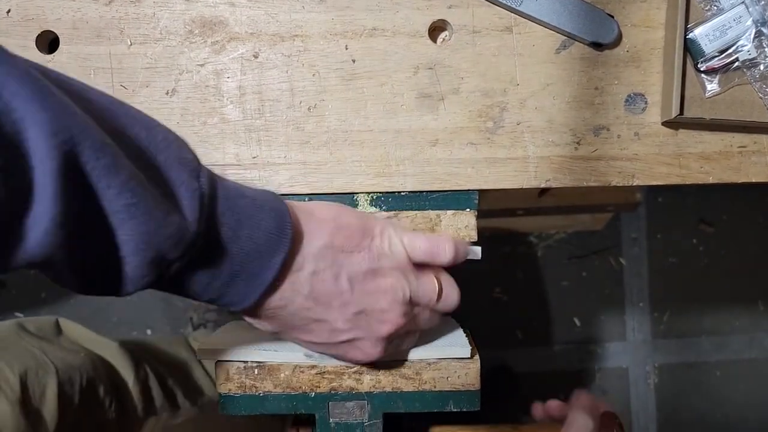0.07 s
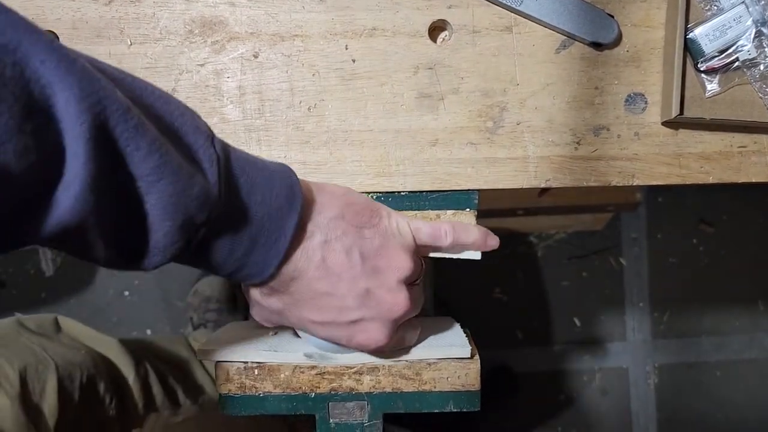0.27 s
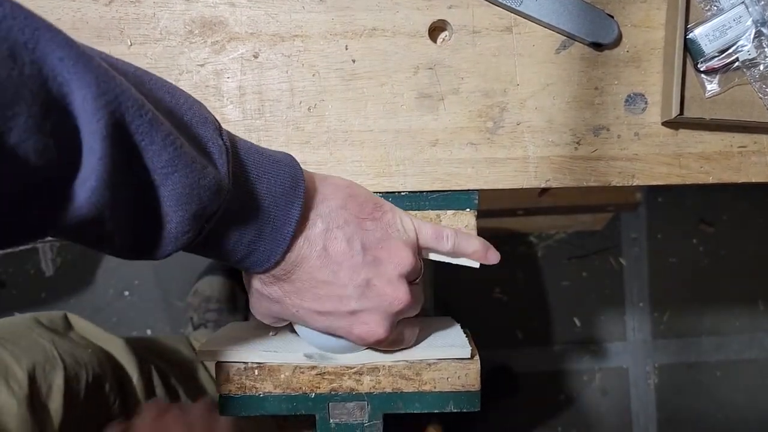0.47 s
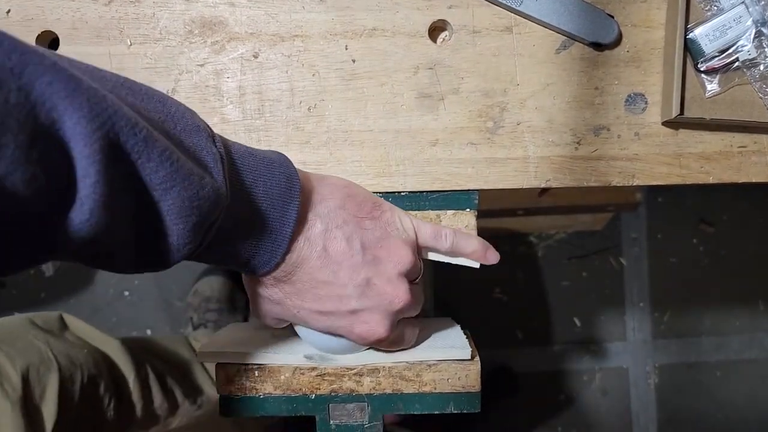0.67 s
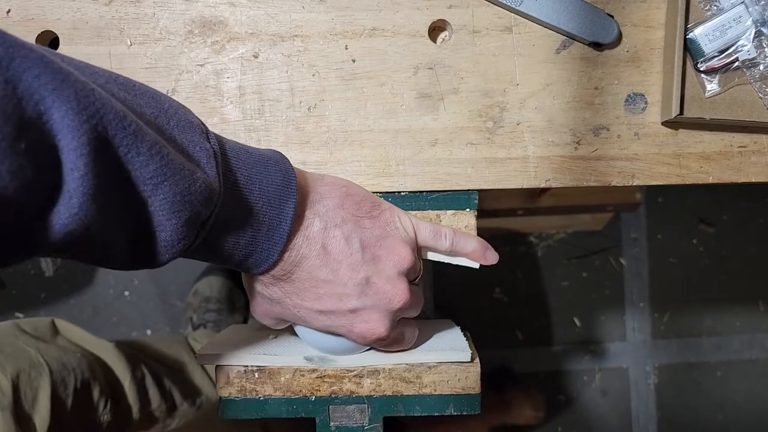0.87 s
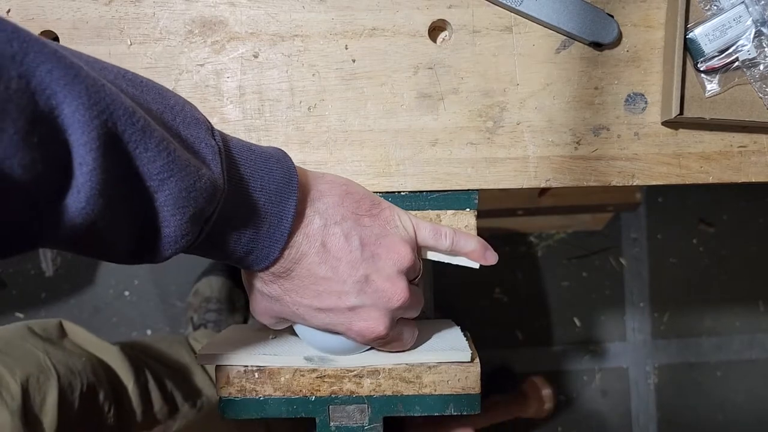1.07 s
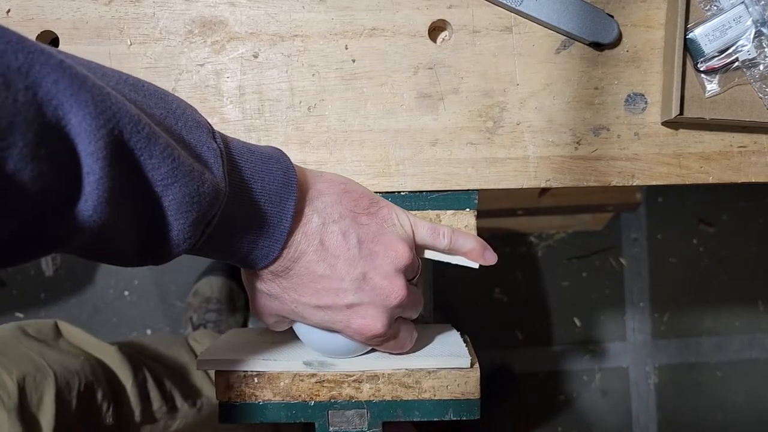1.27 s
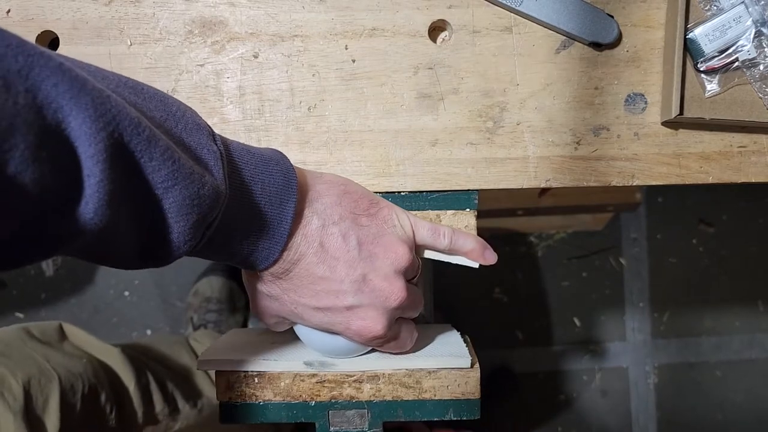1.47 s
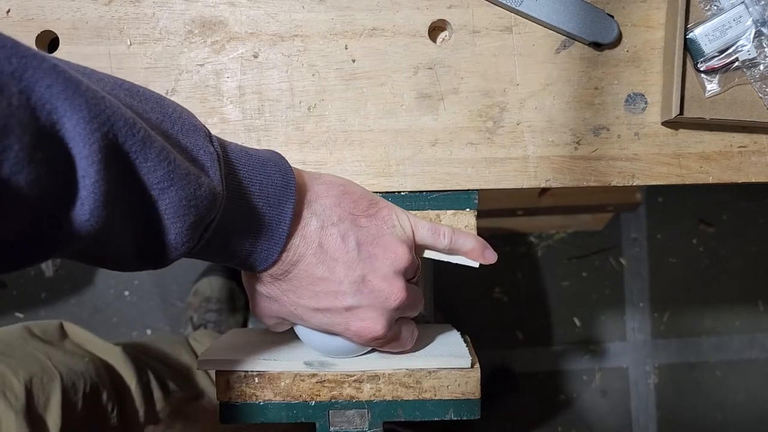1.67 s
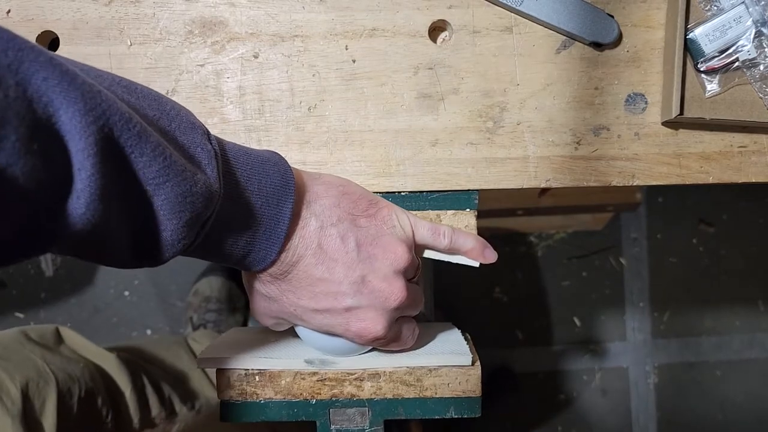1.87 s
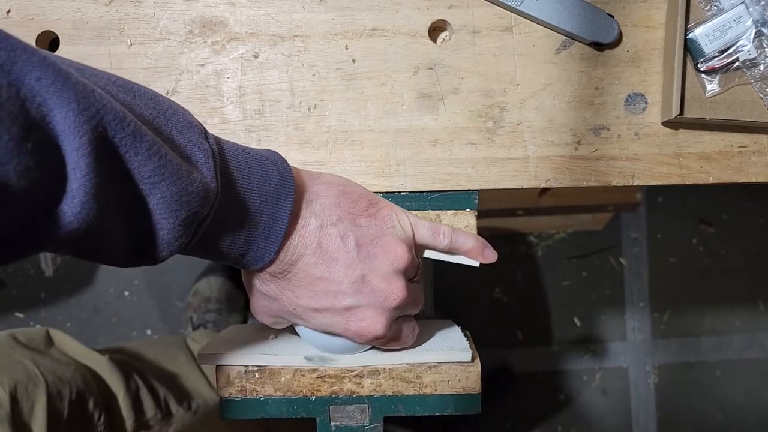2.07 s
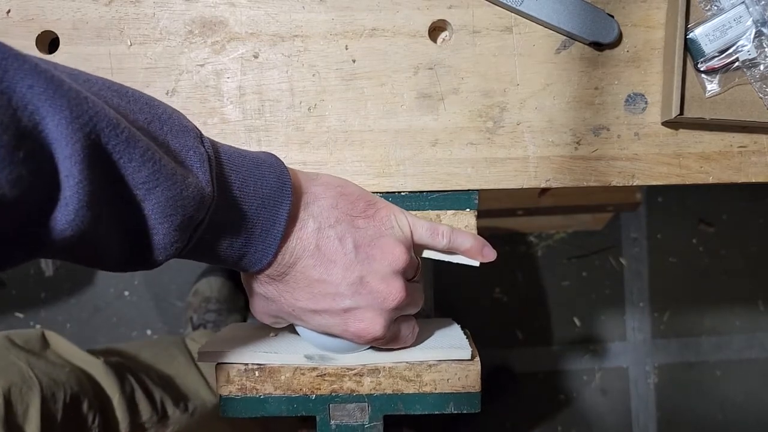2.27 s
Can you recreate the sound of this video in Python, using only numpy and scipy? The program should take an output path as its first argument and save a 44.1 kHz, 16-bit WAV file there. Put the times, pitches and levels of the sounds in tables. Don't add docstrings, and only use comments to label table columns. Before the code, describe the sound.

Close stereo pickup of a wooden-jawed vise knocking and chattering on a hard ball, bench thumping and screw grinding, a brief squeak midway, a second burst of clunks, then quiet hum and soft sleeve rubbing in a small workshop.

```python
import sys
import numpy as np
from scipy import signal
from scipy.fft import rfft, irfft
from scipy.io import wavfile
from scipy.ndimage import uniform_filter1d

SR = 44100
rng = np.random.default_rng(int(sys.argv[2]) if len(sys.argv) > 2 else 0)


def unload_wav(signal):
    wavfile.write(
        sys.argv[1],
        SR,
        np.round(np.clip(np.atleast_2d(signal).T, -1, 1) * 32767).astype(np.int16),
    )


def gain_from_decibels(decibels):
    exponent = np.asarray(decibels, float) / 20
    return 10 ** exponent


N = 101429

# mode_hz [Hz], level_db [dB]
BENCH_MODES = [(75, -7.5), (99, -1.5), (141, 1), (182, 9), (270, -4), (340, -4), (395, -0.5), (480, -0.5),
               (515, -3.5)]
# mode_hz [Hz], level_db [dB]
JAW_MODES = [(665, 3.5), (900, -3), (1100, -4), (1310, -3), (1450, -13), (1640, -1.5), (1815, -30),
             (2020, -4.5), (2200, -5), (2500, -21.5), (2900, -6.5), (3700, 2.5)]
BENCH_T60, JAWS_T60 = 0.14, 0.026
SOFT_HZ = 3390
WIDE_FROM_HZ = 424


def evened(x):
    return x / np.sqrt(np.mean(x ** 2) + 1e-20)


def slow_drift(count, span):
    noise = rng.standard_normal((count, N))
    return evened(uniform_filter1d(uniform_filter1d(noise, span), span))


def read(points, hz):
    f, value = np.transpose(points)
    return np.interp(np.log(hz + 1), np.log(f + 1), value)


def follow(curve):
    s, db = np.transpose(curve)
    return gain_from_decibels(np.interp(np.arange(N) / SR, s, db, left=-90, right=-90))


def add(mix, s, sound):
    part = mix[..., round(s * SR):][..., :sound.shape[-1]]
    part += sound[..., :part.shape[-1]]


def steep(x, hz, kind, order=4):
    return signal.sosfilt(signal.butter(order, hz, kind, fs=SR, output="sos"), x)


def clicks(size, per_s, spread_db):
    strength = gain_from_decibels(spread_db * np.minimum(rng.exponential(1, size), 4))
    present = rng.random(size) < per_s / SR
    return rng.standard_normal(size) * strength * present


def body(modes, t60, detune=0):
    wide_rad, scatter_db, damping_slope = 2.89, 3, 0.16
    hz, db = np.transpose(modes)[:, :, None]
    t = np.arange(SR // 4) / SR
    draw = rng.uniform(-1.083, 1, (len(modes), 3))
    lag = wide_rad * draw[:, :1] / (1 + (WIDE_FROM_HZ / hz) ** 4)
    turn = 2 * np.pi * hz * (1 + detune * draw[:, 1:2]) * t
    decay_db = -60 * t / t60 * (hz / hz[0]) ** damping_slope
    size = gain_from_decibels(db + scatter_db * draw[:, 2:] + decay_db)
    both = np.array([(size * np.sin(turn + side * lag / 2)).sum(0) for side in (1, -1)])
    return both / np.linalg.norm(both) * np.sqrt(2)


def ring(x, response):
    return signal.fftconvolve(x[None], response, axes=1)


def workshop(x):
    # band_hz [Hz], t60_s [s]
    room_decay = [(150, 0.65), (600, 0.48), (2000, 0.35), (6000, 0.53), (14000, 0.38)]
    taps = np.zeros((2, SR))
    at = np.arange(200, SR - 20, 20) + rng.integers(0, 20, (2, (SR - 201) // 20))
    np.put_along_axis(taps, at, rng.choice([-1., 1.], at.shape), 1)
    hz, t, z = signal.stft(taps, SR, nperseg=256)
    wide = 1 / (1 + (WIDE_FROM_HZ / (hz[:, None] + 1)) ** 4)
    z = np.array([z[0], wide * z[1] + np.sqrt(1 - wide ** 2) * z[0]])
    dying = gain_from_decibels(-60 * t / read(room_decay, hz)[:, None])
    tail = signal.istft(z * dying, SR, nperseg=256)[1]
    return signal.fftconvolve(x[None], tail / np.linalg.norm(tail[0]), axes=1)[:, :N]


def hum():
    # pitch_hz [Hz], level_db [dB rms]
    motor_tones = [(47, -49), (118.4, -62.5)]
    out = np.zeros(N)
    for (hz, db), sway in zip(motor_tones, slow_drift(len(motor_tones), 3000)):
        turn = 2 * np.pi * np.cumsum(hz + 0.2 * sway) / SR
        out += np.sqrt(2) * gain_from_decibels(db + 0.8 * sway) * np.sin(turn)
    return out


def coloured(pair, spectrum, db):
    # band_hz [Hz], likeness [0 to 1]
    side_likeness = [(100, 0.97), (300, 0.8), (700, 0.32), (3000, 0.18)]
    hz = np.fft.rfftfreq(N, 1 / SR)
    a, b = rfft(pair)
    same = np.clip(read(side_likeness, hz), 0, 1)
    z = np.array([a, same * a + np.sqrt(1 - same ** 2) * b]) * gain_from_decibels(read(spectrum, hz))
    return gain_from_decibels(db) * irfft(z, N) / np.std(irfft(z * (hz > 200), N))


def hiss():
    # band_hz [Hz], level_db [dB]
    air_colour = [(38, -11.5), (65, -11.5), (97, -10.5), (414, -29), (755, -42), (1630, -34), (3500, -48),
                  (4550, -86.5), (7700, -120)]
    # band_hz [Hz], level_db [dB]
    cloth_colour = [(1470, -32.5), (2500, -9.5), (4560, -4), (7570, -3.5), (15700, -15.5)]
    # time_s [s], level_db [dB]
    rub_level = [(0, -64), (.6, -67), (.72, -72), (.83, -66), (.87, -71), (1.05, -67), (1.15, -68),
                 (1.3, -60.5), (1.36, -98), (1.49, -81.5), (1.7, -53.5), (1.81, -108), (1.86, -60.5),
                 (2.02, -66), (2.08, -74), (2.22, -72.5), (2.24, -60.5), (2.26, -75), (2.3, -76)]
    grain = np.array([clicks(N, 55000, spread_db=-20) for _ in "lr"])
    rub = coloured(grain, cloth_colour, db=2.5) * follow(rub_level)
    return rub + coloured(rng.standard_normal((2, N)), air_colour, db=-65)


def whistle(size, hz, overtones):
    turn = 2 * np.pi * np.cumsum(hz) / SR
    return size * np.sin(turn) + sum(gain_from_decibels(d) * size ** 0.97 * np.sin(k * turn) for k, d in overtones)


def squeaks():
    # time_s [s], pitch_hz [Hz], level_db [dB rms]
    squeal_path = [(0.72, 3340, -62.5), (0.742, 3203, -24.5), (0.75, 3235, -19), (.765, 3180, -19),
                   (.778, 3173, -40.5), (0.784, 3162, -34), (0.796, 3277, -44.5), (.81, 3224, -41),
                   (0.823, 3227, -36.5), (0.831, 3156, -23.5), (0.834, 3110, -35), (.842, 3080, -45.5),
                   (.85, 3200, -46), (.875, 3213, -43), (.905, 3210, -49), (0.919, 3200, -53.5),
                   (0.941, 3200, -56.5), (0.987, 3200, -54)]
    # multiple [x pitch], level_db [dB at full strength]
    squeal_overtones = [(2, -27), (3, -44.5), (4, -56)]
    # peak_s [s], level_db [dB rms], rise_s [s], fall_s [s], pitch_hz [Hz]
    short_whistles = [
        (0.307, -40, 0.0022, 0.0027, 3270),
        (.648, -48.5, 0.0048, 0.007, 3197),
        (.672, -63, 0.0026, 0.0099, 12250),
        (1.652, -72.5, .005, 0.0086, 14300),
    ]
    wobble_hz, sag_hz, flutter_db = 22, 12, 2.5
    t = np.arange(N) / SR
    wobble, flutter = slow_drift(2, 150)
    s, hz, db = np.transpose(squeal_path)
    size = np.sqrt(2) * follow(np.transpose([s, db]))
    weak = 1 / (1 + size / 0.01)
    pitch = np.interp(t, s, hz) + wobble_hz * wobble * weak
    out = whistle(size * gain_from_decibels(flutter_db * flutter * weak), pitch, squeal_overtones)
    for s, db, rise, fall, hz in short_whistles:
        swell = np.clip((t - s) / np.where(t < s, rise, fall), -50, 50)
        size = np.sqrt(2) * gain_from_decibels(db) / np.cosh(swell)
        pitch = hz * (1 + wobble_hz / 3200 * wobble) - sag_hz * np.tanh((t - s) / (2 * fall))
        out += whistle(size, pitch, [])
    return out * gain_from_decibels([[.7], [-.7]])


def grind():
    # time_s [s], level_db [dB]
    screw_load = [(.1, -72), (.2, -50.5), (.25, -29.5), (.36, -43.5), (.44, -45.5), (.5, -25), (.62, -43),
                  (.72, -45.5), (.87, -38.5), (1.08, -39.5), (1.16, -47.5), (1.26, -37.5), (1.36, -46),
                  (1.49, -66.5), (1.57, -33), (1.74, -41), (1.9, -42.5), (2.08, -58)]
    drive = evened(clicks(N, 3500, spread_db=4.0)) * follow(screw_load)
    bench = gain_from_decibels(5.5) * ring(drive, body(BENCH_MODES, BENCH_T60))
    jaws = gain_from_decibels(-6.5) * ring(drive, body(JAW_MODES, JAWS_T60))
    return steep((bench + jaws)[:, :N], SOFT_HZ, "low")


def thump(s, db, upper_db, hz):
    length = round(0.011 * SR)
    push = np.hanning(length) * rng.standard_normal(2000)[:length]
    bench = steep(ring(push, body(BENCH_MODES, BENCH_T60, 0.042)), 485, "low")
    hollow = steep(ring(push, body([(hz, 0), (2 * hz, -6)], t60=0.048)), 1200, "low")
    bench = gain_from_decibels(2) * bench / abs(bench).max()
    hollow = gain_from_decibels(upper_db + 8) * hollow / abs(hollow).max()
    return s - .003, gain_from_decibels(db) * (bench + hollow)


def jolt(s, db):
    # mode_hz [Hz], level_db [dB]
    handle_modes = [(7340, 0.5), (8370, -15.5)]
    rattle = np.exp(-np.arange(2000) / 500) * clicks(2000, 4100, spread_db=2.0)
    out = ring(rattle, body(handle_modes, 0.02, 0.006)[:, :2000])
    return s, gain_from_decibels(db) * out / abs(out).max()


def tick_colour(bright_db):
    # band_hz [Hz], level_db [dB]
    crack_colour = [(1760, -6.5), (3000, -1.5), (4520, -9.5), (6210, -10), (9000, -18.5), (15700, -25.5)]
    dulling = 0.27
    hz = np.fft.rfftfreq(256, 1 / SR)
    tilt = dulling * min(bright_db + 2, 0) * np.log2(np.maximum(hz / 4000, 1))
    bass_cut = 1 + (2000 / (hz + 1)) ** 6
    pulse = irfft(gain_from_decibels(read(crack_colour, hz) + tilt) / bass_cut)
    return np.roll(pulse, 128)[None, 96:192]


def contact(t, hz, rise):
    t60, lag_rad = 0.033, 1.2
    lag, phase, bend = rng.uniform(-1.01, 1, 3)
    size = np.minimum(t / rise, 1) * gain_from_decibels(-60 * np.maximum(t - rise, 0) / t60)
    turn = 2 * np.pi * hz * t * (1 + .5 * bend * t) + np.pi * phase
    return size * np.sin(turn + lag_rad * lag * np.array([[.5], [-.5]]))


def knock(s, db, bright_db, hz, rise):
    chatter_s, tail_s, crack_s = 0.0044, 0.028, 0.09
    focus_db = -10
    t = np.arange(SR // 8) / SR
    after = np.maximum(t - rise, 0)
    decay = np.exp(-after / chatter_s) + gain_from_decibels(-10) * np.exp(-after / tail_s)
    shape = decay * np.minimum(t / rise, 1) ** 1.15
    drive = evened(clicks(len(t), 9000, spread_db=0.5)) * shape
    near = [(f, d + focus_db * np.log2(f / hz) ** 2) for f, d in JAW_MODES]
    jaws = gain_from_decibels(4) * ring(drive, body(near, JAWS_T60, 0.087)[:, :3000])
    add(jaws, 0, gain_from_decibels(-7) * abs(jaws).max() * contact(t, hz, rise))
    jaws = steep(jaws, SOFT_HZ, "low")
    fizz = (drive + 2.4 * shape * rng.standard_normal((2, len(t)))) * np.exp(-after / crack_s)
    crack = signal.fftconvolve(fizz, tick_colour(bright_db), axes=1)[:, 32:]
    out = jaws / abs(jaws).max()
    add(out, 0, gain_from_decibels(bright_db + 7.5) * crack / abs(crack).max())
    return s - .0005, gain_from_decibels(db) * out


def scene():
    # start_s [s], peak_db [dB], bright_db [dB], contact_hz [Hz], rise_s [s]
    early_knocks = [(.082, -54.5, -22, 870, .001), (.13, -53, -21, 1270, 0.0018),
                    (0.216, -24.5, -23, 1093, 0.0022), (0.222, -9.5, -25.5, 1454, 0.006),
                    (.232, -19.5, -10.5, 2026, 0.0014), (0.251, -22, -9, 1930, 0.0024),
                    (.265, -14, -20, 720, 0.0049), (0.272, -15, -17, 1610, 0.0016),
                    (.294, -17.5, -29, 1630, 0.00086), (.459, -20, -12.5, 2860, 0.00095),
                    (.477, -10.5, -19, 1188, 0.0061), (0.542, -18, -34, 975, 0.0052),
                    (0.627, -35.5, -33, 1590, 0.0035), (.79, -28.5, -38.5, 1480, .002),
                    (0.829, -35, -21, 954, 0.0027), (.844, -36.5, -7.5, 1070, .001),
                    (.858, -22.5, -14, 935, 0.00072), (0.873, -25.5, -16.5, 1080, .001),
                    (0.885, -22, -37, 1490, 0.0012), (.951, -33.5, -21.5, 1093, 0.008),
                    (.976, -15, -28, 1021, 0.0026), (1.016, -25.5, -28, 1174, 0.004),
                    (1.036, -37, -8, 900, 0.003), (1.115, -29.5, -35, 956, 0.0041),
                    (1.177, -27.5, -27.5, 775, 0.0021), (1.182, -18.5, -35, 1219, 0.0016),
                    (1.19, -14.5, -26, 1563, 0.0026), (1.212, -24.5, -15.5, 1500, 0.0025),
                    (1.23, -14.5, -18, 1040, 0.0023), (1.24, -20.5, -40, 2080, 0.00089),
                    (1.317, -31, -22, 880, 0.0023), (1.39, -40.5, -26, 1170, .002)]
    late_knocks = [(1.5, -12, -35.5, 963, 0.00049), (1.541, -23, -30, 980, 0.0026),
                   (1.555, -23.5, -46, 1225, 0.0088), (1.585, -23, -32, 974, 0.0048),
                   (1.62, -10, -30, 1686, 0.0045), (1.631, -15, -28, 983, 0.0045),
                   (1.64, -5.5, -28, 2003, 0.0037), (1.696, -17.5, -43.5, 1873, 0.0054),
                   (1.717, -35.5, -14.5, 1430, 0.0011), (1.771, -21, -20, 2625, 0.0023),
                   (1.773, -14.5, -27.5, 1533, 0.00077), (1.802, -26, -36, 896, 0.0033),
                   (1.812, -25.5, -37, 1507, 0.0016), (1.838, -19, -24.5, 1368, 0.00063),
                   (1.858, -31.5, -21, 1230, .002), (1.918, -40, -12, 1008, .002),
                   (1.981, -38.5, -12.5, 842, 0.0021), (2.239, -61, -18, 804, 0.004)]
    # start_s [s], peak_db [dB], upper_db [dB], upper_hz [Hz]
    bench_thumps = [(0.227, -19.5, -3, 330), (0.267, -17, -0.5, 338), (0.301, -24.5, -8, 522),
                    (0.327, -29.5, 0, 538), (0.476, -16.5, -2, 423), (0.465, -29.5, 1.5, 400),
                    (0.508, -21, -12, 404), (0.574, -23, -5.5, 379), (0.755, -31.5, -6, 345),
                    (0.798, -25.5, -6, 346), (0.828, -21, -24.5, 428), (0.881, -20, -16, 387),
                    (0.986, -15.5, -6, 505), (0.655, -38, -12, 377), (1.052, -25, -44, 357),
                    (1.184, -18.5, -1, 371), (1.234, -34.5, 10, 287), (1.257, -24, -6.5, 470),
                    (1.33, -37.5, -6.5, 504), (1.406, -27, -12, 377), (1.578, -26, -0.5, 460),
                    (1.629, -14, -8.5, 510), (1.657, -15, -11, 365), (1.544, -27, -4.5, 404),
                    (1.69, -34, 5.5, 394), (1.722, -30, 3.5, 341), (1.845, -30.5, -1.5, 349),
                    (1.872, -35.5, 0, 291.4), (1.916, -34, 2, 366), (1.976, -32.5, -11.5, 406),
                    (2.24, -35, -12.5, 397)]
    # start_s [s], peak_db [dB]
    handle_jolts = [(.236, -51.5), (.488, -36.5), (.875, -33), (1.036, -50), (1.213, -51.5), (1.505, -54),
                    (1.663, -31), (1.684, -47), (1.717, -44), (1.839, -46.5), (1.857, -50.5)]
    vise, whistles = grind(), squeaks()
    blows = [(knock, early_knocks), (knock, late_knocks), (thump, bench_thumps), (jolt, handle_jolts)]
    for source, table in blows:
        for row in table:
            add(vise, *source(*row))
    vise = steep(vise * gain_from_decibels([[-.79], [.79]]), 88.3, "high")
    wet = workshop(gain_from_decibels(-8.5) * vise.mean(0) + gain_from_decibels(-16) * whistles.mean(0))
    return vise + whistles + wet + hum() + steep(hiss(), 45, "high")


def roll_off(x):
    return signal.sosfilt(signal.butter(12, 15840, fs=SR, output="sos"), x)


def record(dry):
    return roll_off(dry)


dry = scene()
out = record(dry)
unload_wav(out)
```